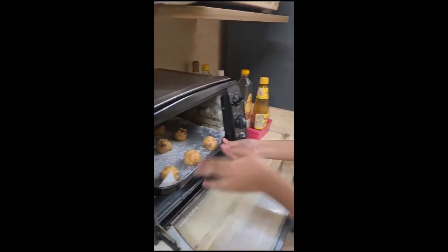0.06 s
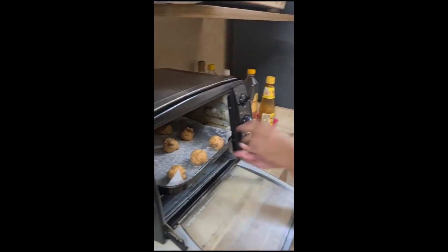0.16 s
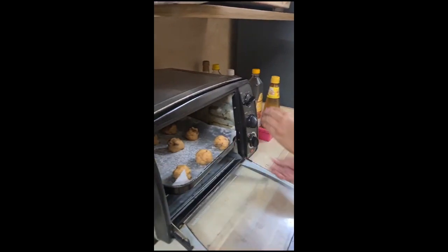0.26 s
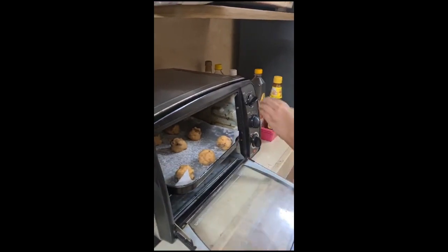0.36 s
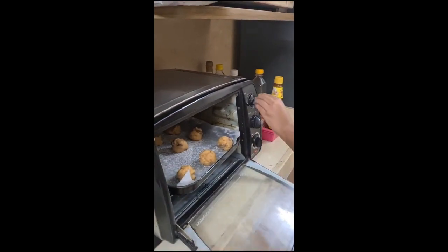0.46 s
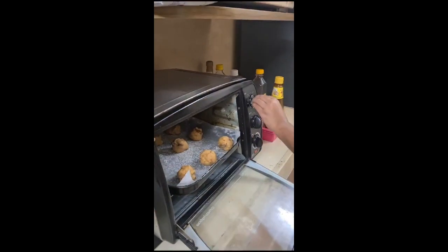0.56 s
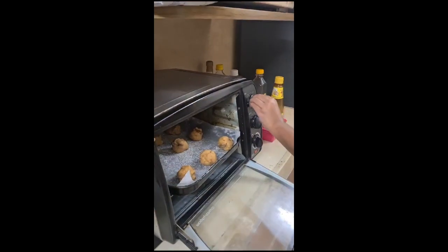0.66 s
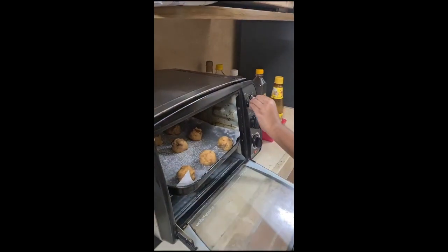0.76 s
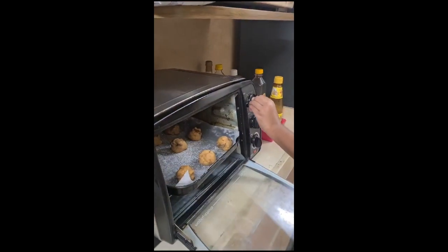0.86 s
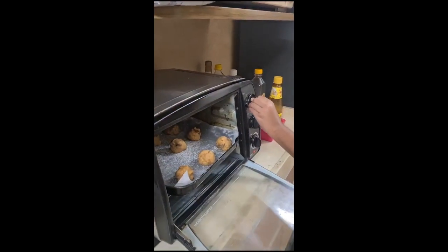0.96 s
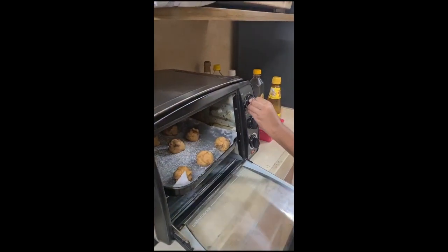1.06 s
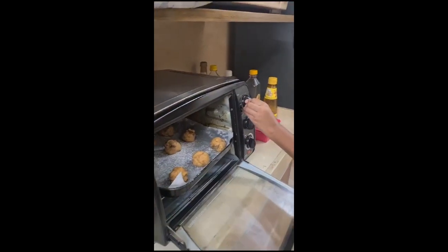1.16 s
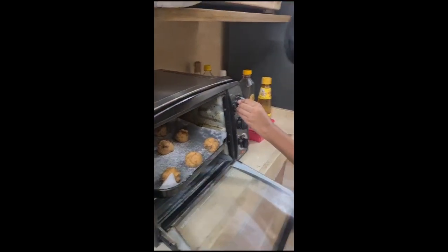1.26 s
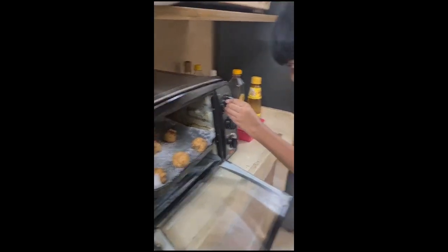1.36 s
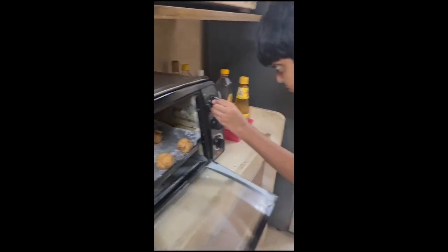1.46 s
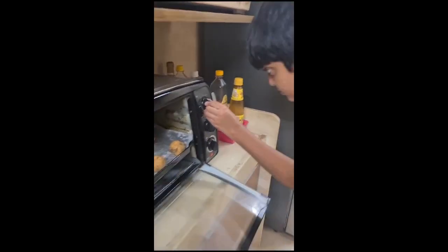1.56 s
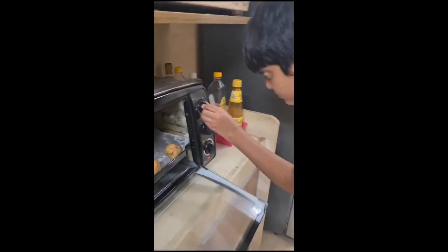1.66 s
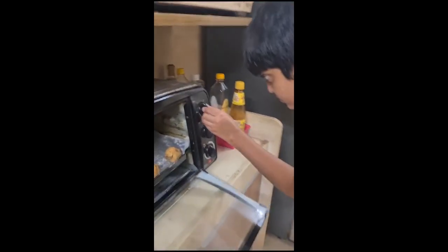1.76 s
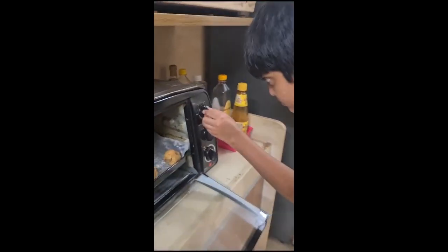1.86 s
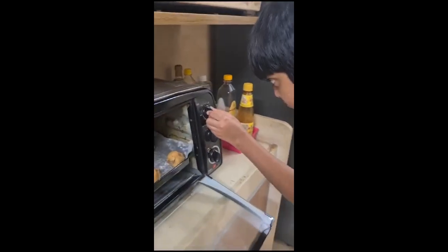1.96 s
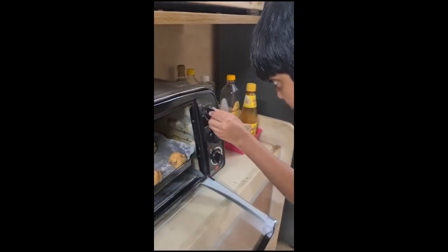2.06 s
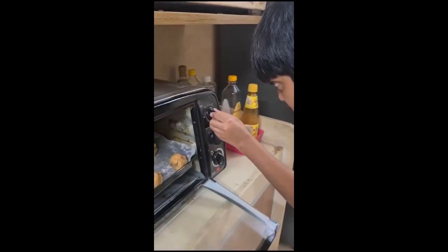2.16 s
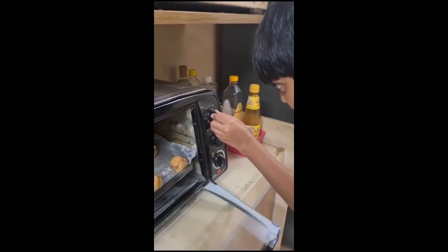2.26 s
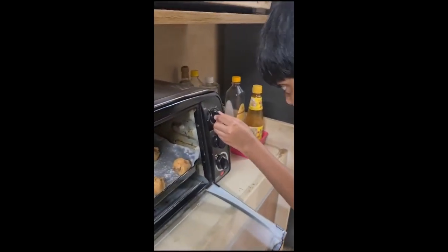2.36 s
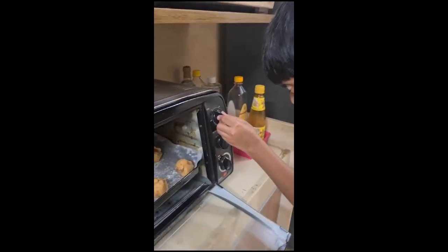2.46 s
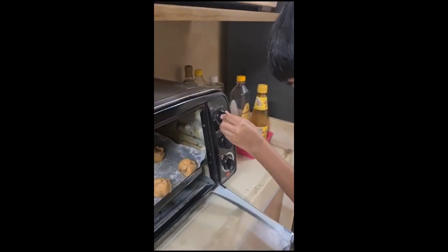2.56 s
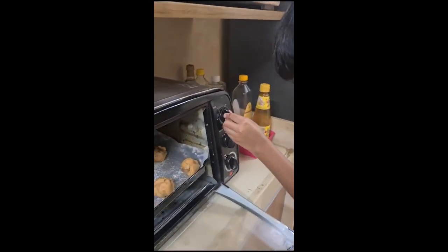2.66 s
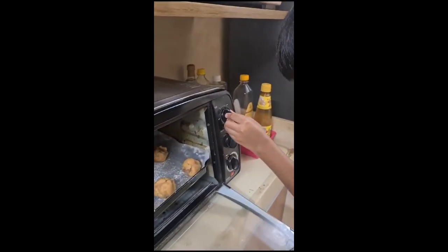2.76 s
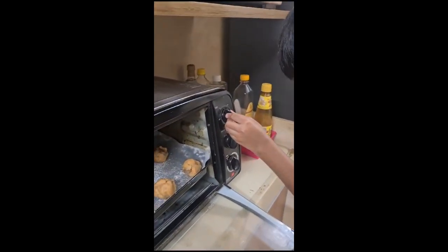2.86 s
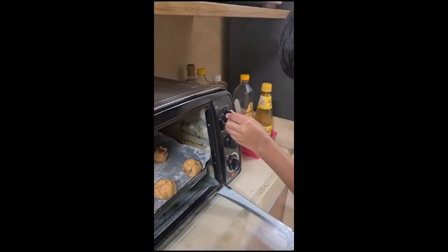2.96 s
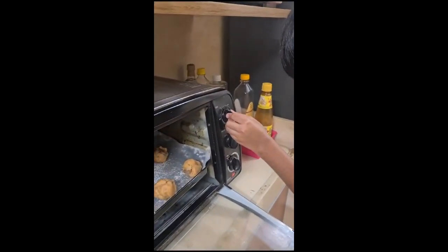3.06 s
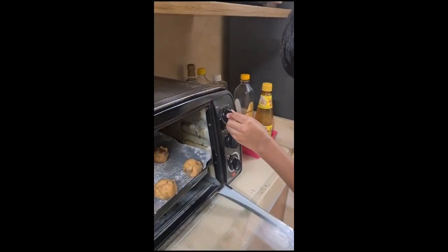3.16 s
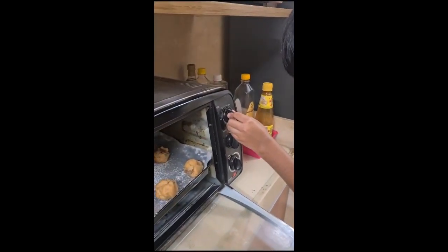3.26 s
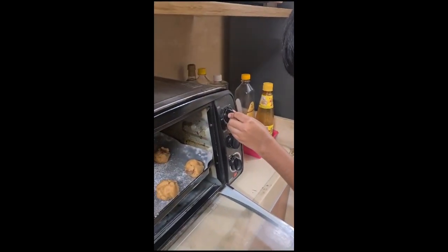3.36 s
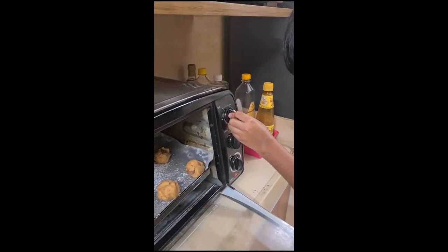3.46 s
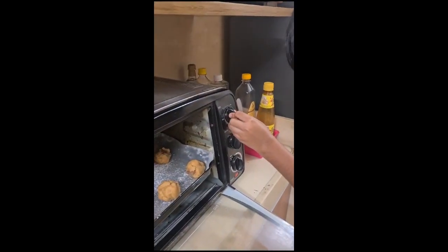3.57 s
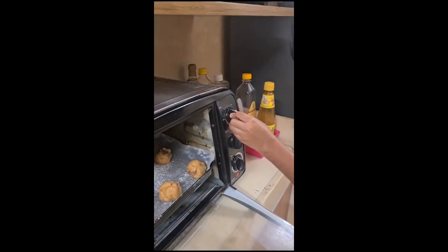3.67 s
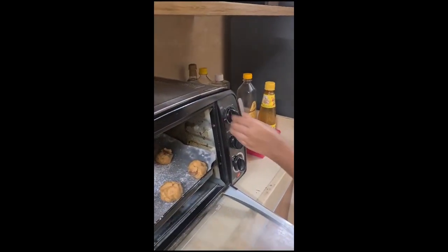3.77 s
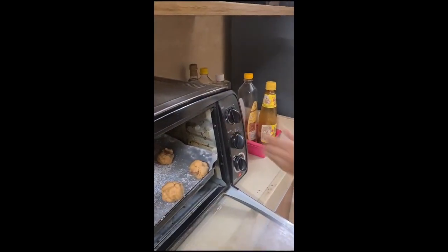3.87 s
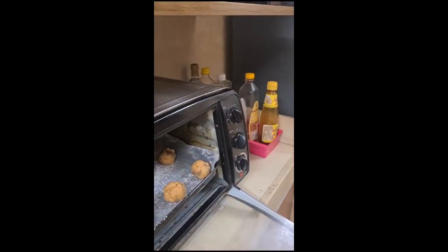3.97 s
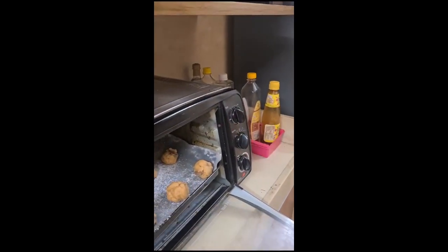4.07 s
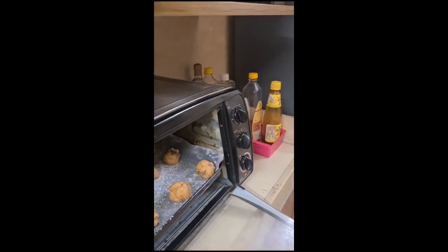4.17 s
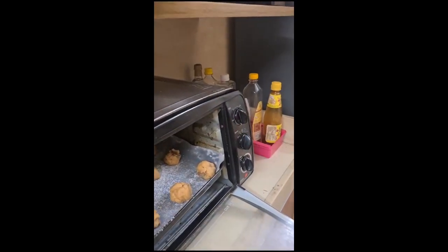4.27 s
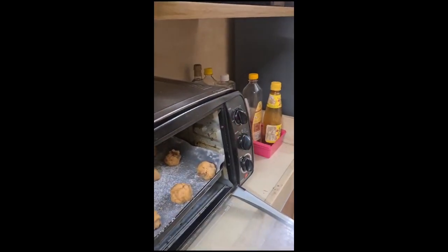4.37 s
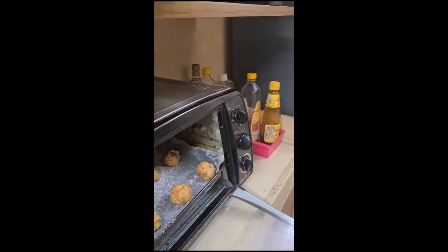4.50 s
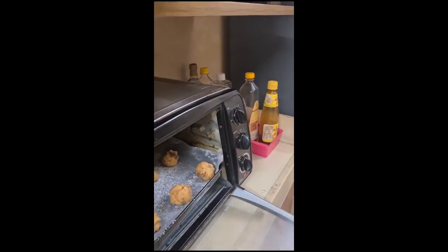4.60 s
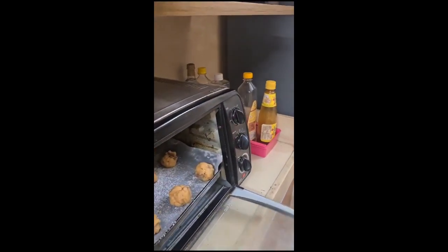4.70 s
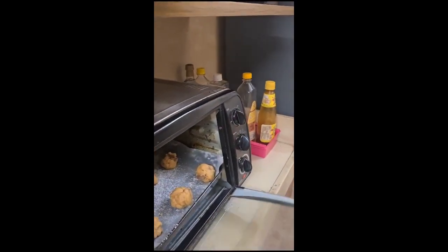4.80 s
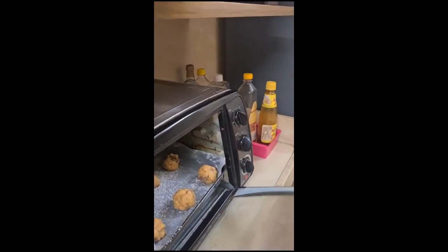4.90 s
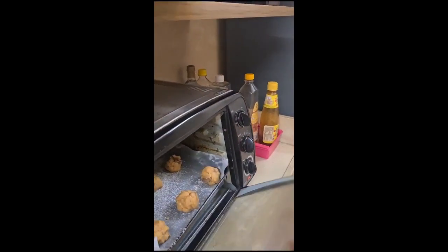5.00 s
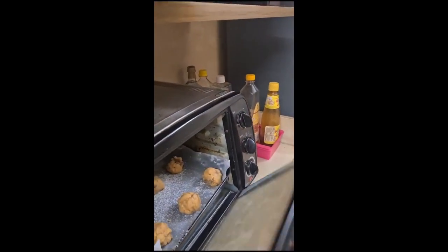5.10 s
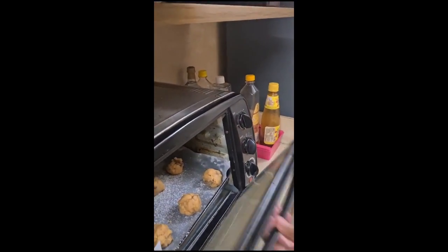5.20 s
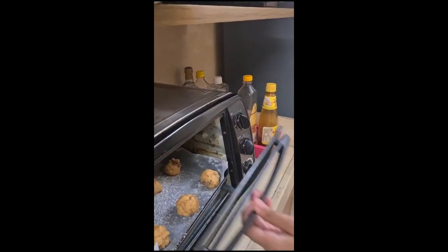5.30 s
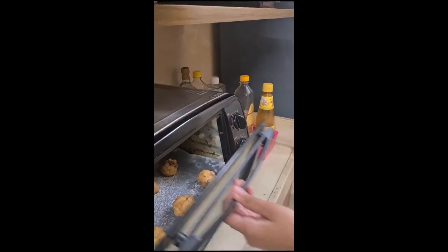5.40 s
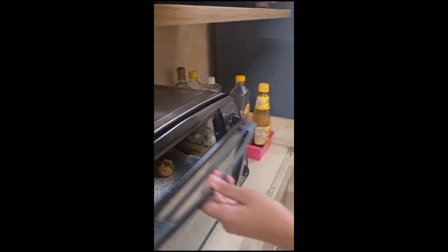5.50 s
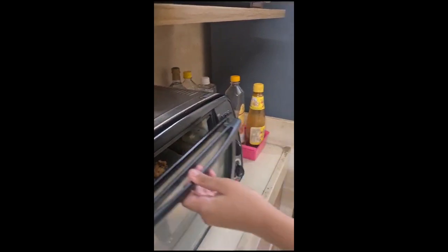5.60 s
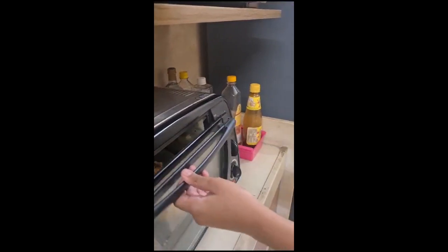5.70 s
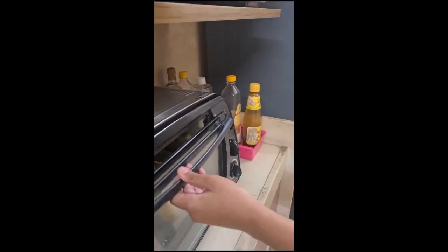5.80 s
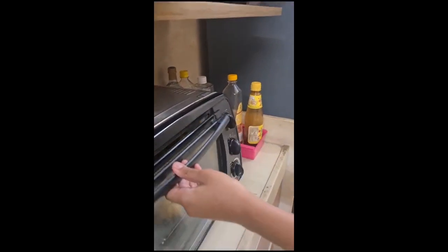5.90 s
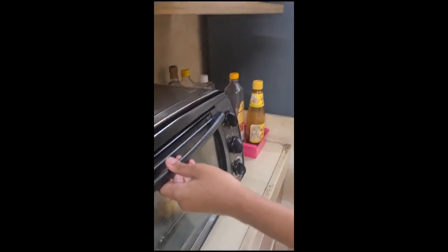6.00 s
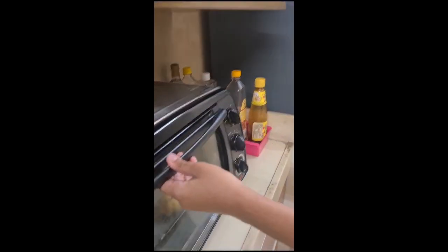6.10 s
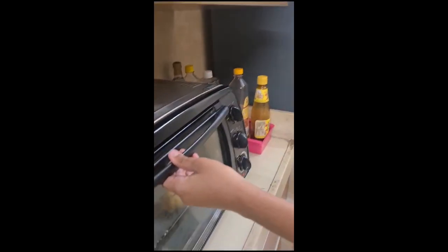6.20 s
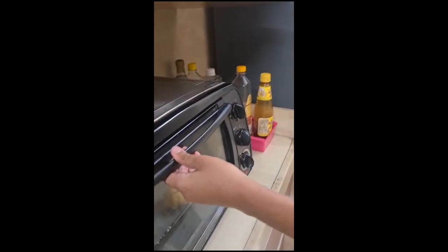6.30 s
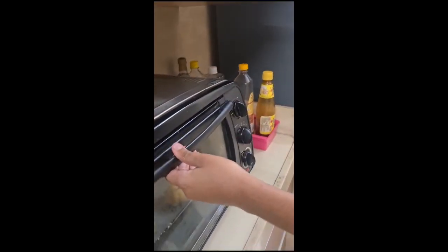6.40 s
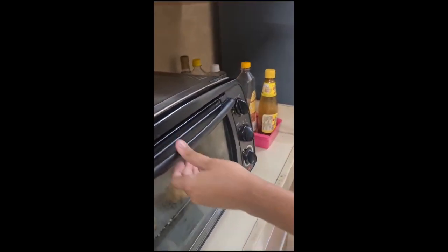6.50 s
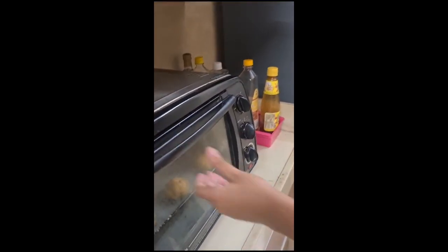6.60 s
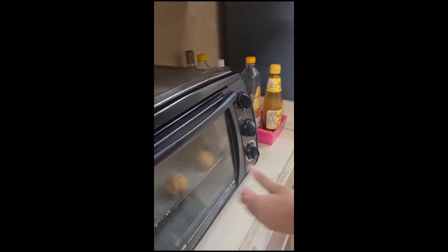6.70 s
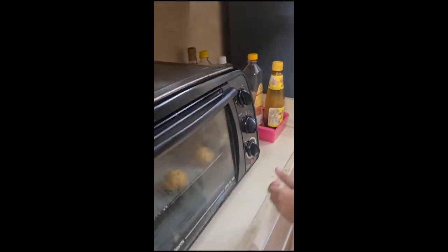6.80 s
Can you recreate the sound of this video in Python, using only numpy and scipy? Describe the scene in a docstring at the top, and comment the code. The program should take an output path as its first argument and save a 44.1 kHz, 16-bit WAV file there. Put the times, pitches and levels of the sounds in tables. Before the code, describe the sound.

A metal tray scrapes into a small oven, a knob is turned, and the glass door shuts with a loud, ringing clack.

```python
"""The glass door of a small countertop oven swings up with a loud clack and shuts against its frame.
Before that, a metal tray is nudged along its rails, a knob is turned and the tray is pushed home.
Each knock or scrape makes the metal case, door or tray ring, and the kitchen adds a short echo.
Dry metal squeals briefly, and shocks thud through the cabinet. The hand-held stereo microphone
picks up bumps and rumble from the grip, a faint rustle, steady air noise and a low appliance hum."""
import sys
import numpy as np
from scipy import signal
from scipy.fft import rfft, irfft
from scipy.io import wavfile

SR = 44100
rng = np.random.default_rng(int(sys.argv[2]) if len(sys.argv) > 2 else 0)


def generate_wav(sig):
    """Save sig (samples, or channels by samples) to the path in sys.argv[1] as 16-bit PCM at SR."""
    pcm = np.round(np.clip(np.atleast_2d(sig).T, -1, 1) * 32767).astype(np.int16)
    wavfile.write(sys.argv[1], SR, pcm)


N = 302085
TIME = np.arange(N) / SR
SPAN = 32768  # samples set aside for one short sound
SPAN_HZ = np.maximum(np.arange(SPAN // 2 + 1) * SR / SPAN, 1)

# the microphone's right side faces away from the oven: pitch_hz, gain_db (against the left)
RIGHT_SIDE_SHADE = [(60, 8.5), (130, 0), (500, -3), (900, -7), (1600, -16.5), (3200, -18), (5000, -17.5),
                    (7500, -31), (9300, 0), (11000, -6), (14000, -19)]
# tone of the rubbing at the knob and the door handle: pitch_hz, gain_db
RUB_TONE = [(115, 4), (400, -13.5), (1340, 1), (3900, -4.5), (6000, -9), (9500, -6), (14000, -19.5)]


def from_db(db):
    """Turn decibels into a gain."""
    return 10 ** (np.asarray(db) / 20)


def unit(x):
    """Scale a sound to an energy of one."""
    return x / np.sqrt(np.sum(x ** 2, axis=-1, keepdims=True) + 1e-20)


def at_hz(points, hz, column=1):
    """Read between the rows of a table, with pitch counted in octaves."""
    points = np.array(points)
    return np.interp(np.log(hz), np.log(points[:, 0]), points[:, column])


def colour(x, points, column=1):
    """Filter a sound to follow a tone curve in dB."""
    cepstrum = irfft(np.log(from_db(at_hz(points, SPAN_HZ, column))))
    # folding onto the first half keeps the filter from ringing before a hit
    cepstrum[1:SPAN // 2] *= 2
    cepstrum[SPAN // 2 + 1:] = 0
    kernel = irfft(np.exp(rfft(cepstrum)))[:SPAN // 8]
    kernel = kernel.reshape((1,) * (x.ndim - 1) + (-1,))
    return signal.oaconvolve(x, kernel, axes=-1)[..., :x.shape[-1]]


def add(out, start_s, sound):
    """Mix a stereo sound in at a given time."""
    start = max(round(start_s * SR), 0)
    out[:, start:start + sound.shape[1]] += sound[:, :N - start]


def drift(per_s):
    """A slow random wobble, about one in size."""
    return np.interp(TIME * per_s, np.arange(1000), rng.standard_normal(1000))


def noise_pair(size, alike):
    """Left and right white noise; alike is the share they have in common."""
    common = np.sqrt(alike) * rng.standard_normal(size)
    return common + np.sqrt(1 - alike) * rng.standard_normal((2, size))


def room_air():
    """Steady, mostly deep noise fills the kitchen."""
    # the air noise on each side: pitch_hz, level_db (per Hz)
    left_tone = [(20, -80), (40, -71.5), (70, -76.5), (115, -73), (200, -82), (400, -91), (700, -93),
                 (1200, -95), (1700, -105), (2600, -112), (5000, -118), (6000, -118), (10000, -126),
                 (14000, -128)]
    right_tone = [(20, -66), (40, -56.5), (70, -62.5), (115, -65.5), (200, -77.5), (400, -84.5), (700, -95),
                  (1200, -101), (1700, -110), (2600, -120), (5000, -121), (6000, -120), (10000, -125),
                  (14000, -128)]
    left, right = noise_pair(N, alike=0.22) * np.sqrt(SR / 2)
    return np.array([colour(left, left_tone), colour(right, right_tone)])


def appliance_hum(waver_db=4.0):
    """An appliance hums in a few low, wavering tones."""
    # the tones of the hum: pitch_hz, level_db (before wavering)
    tones = [(100, -52), (147, -58.5), (250, -66), (347, -65.5)]
    hum = 0
    for hz, db in tones:
        peak = np.sqrt(2) * from_db(db + waver_db * drift(7))
        hum = hum + peak * np.sin(2 * np.pi * hz * TIME + drift(6))
    return hum


def hand_movement(resting_rustle_db=-60.5, rumble_left_db=-11.0, flutter_db=3.5):
    """With each move the grip rumbles, mostly on the right; arm and door rustle faintly."""
    # the arm reaches for the knob, takes the door, shuts it and pulls back:
    # middle_s, half_length_s, rumble_db, rustle_db
    gestures = [(.8, 1.0, -50.5, -64), (4.8, 0.44, -49, -55), (6.03, 0.36, -34, -56.5),
                (6.7, 0.21, -41, -68.5)]
    # tone of the rumble and of the rustle: pitch_hz, gain_db
    rumble_tone = [(20, -28.5), (50, 7), (75, 7), (130, -0.5), (220, -11), (500, -34), (1500, -82)]
    rustle_tone = [(100, -0.5), (300, 4), (600, -6), (1300, -14.5), (3000, -26), (6000, -35), (8000, -33),
                   (10000, -44.5)]
    rumble_power, rustle_power = 0, from_db(resting_rustle_db) ** 2
    for middle_s, half_length_s, rumble_db, rustle_db in gestures:
        swell = np.exp(-((TIME - middle_s) / half_length_s) ** 2)
        rumble_power = rumble_power + swell * from_db(rumble_db) ** 2
        rustle_power = rustle_power + swell * from_db(rustle_db) ** 2
    rumble = np.sqrt(N) * unit(colour(noise_pair(N, alike=0.91), rumble_tone))
    rumble *= from_db([[rumble_left_db], [0]])
    left, right = np.sqrt(N) * unit(colour(noise_pair(N, alike=0.38), rustle_tone))
    rustle = np.array([left, colour(right, RIGHT_SIDE_SHADE)]) * from_db(flutter_db * drift(7.7))
    return rumble * np.sqrt(rumble_power) + rustle * np.sqrt(rustle_power)


def low_ring(hz, fade_s, db, pan_db):
    """One tone that falls by 60 dB in fade_s; a negative pan_db moves it right."""
    t = TIME[:SPAN]
    sides = from_db([[db + pan_db / 2], [db - pan_db / 2]])
    return sides * np.sin(2 * np.pi * hz * t) * from_db(-60 * t / fade_s)


def grip_bumps(cycles=2.17):
    """The hand bumps the microphone's right side; each bump dies within a few cycles."""
    # bumps of the hand: start_s, pitch_hz, level_db
    bumps = [(0.918, 200, -38), (1.46, 280, -31), (2.941, 262, -39), (6.038, 107, -11.5), (6.055, 149, -16),
             (6.212, 141, -28), (6.444, 325, -41)]
    out = np.zeros((2, N))
    for start_s, hz, db in bumps:
        add(out, start_s, low_ring(hz, cycles / hz, db, pan_db=-18))
    return out


def cabinet_thuds(fall_db_per_octave=25):
    """A shock wakes the cabinet's low tones, most of all those near its own pitch."""
    # low tones of the cabinet on the counter: pitch_hz, gain_db, fade_s
    tones = [(106, 0, 0.2), (180, -1, 0.96), (281, 1, 0.64), (503, -4.5, 0.26)]
    # shocks that shake it: start_s, pitch_hz, level_db
    shocks = [(.321, 177, -37), (3.715, 288, -43.5), (4.51, 281, -44), (5.512, 112, -21),
              (5.513, 455, -23.5), (5.966, 106, -18.5), (5.996, 111, -16)]
    out = np.zeros((2, N))
    for start_s, shock_hz, shock_db in shocks:
        for hz, gain_db, fade_s in tones:
            db = shock_db + gain_db - fall_db_per_octave * abs(np.log2(hz / shock_hz))
            add(out, start_s, low_ring(hz, fade_s, db, pan_db=-0.5))
    return out


def kitchen_echo(build_s=0.0015):
    """Reflections build up quickly and die sooner in the treble."""
    # time the echo takes to fall by 60 dB: pitch_hz, fade_s
    fades = [(100, 1), (260, 0.62), (700, 0.56), (1840, 0.43), (4850, 0.37), (12800, 0.3)]
    t, echo = TIME[:SPAN], 0
    spectrum = rfft(noise_pair(SPAN, alike=0.45))
    edges_hz = np.geomspace(20, SR / 2, 13)
    for low, high in zip(edges_hz, edges_hz[1:]):
        band = irfft(spectrum * ((SPAN_HZ >= low) & (SPAN_HZ < high)))
        echo = echo + band * from_db(-60 * t / at_hz(fades, np.sqrt(low * high)))
    return unit(echo * (1 - np.exp(-t / build_s)))


def tap_sound(tones, bands, click_db, panel_fade_s, ring_db, echo_db, longest_fade_s=0.49):
    """How a part answers one tap: a click, a noisy burst from its panels, ringing tones and the echo."""
    t, ring = TIME[:SPAN], 0
    click = from_db(click_db) * (t == 0)
    panels = unit(noise_pair(SPAN, alike=0.25) * from_db(-60 * t / panel_fade_s))
    for hz, db, fade_s in tones:
        start_db = db + 7.0 * np.log2(hz / 1000)  # higher tones gain 7 dB per octave
        fade = from_db(start_db - 60 * t / min(fade_s, longest_fade_s))
        ring = ring + fade * np.sin(2 * np.pi * hz * t) * rng.choice([-1, 1])
    tap = unit(click + panels + from_db(ring_db) * ring + from_db(echo_db) * kitchen_echo())
    # clusters of close tones lift a few broad bands
    lift = sum(from_db(db) * signal.lfilter(*signal.iirpeak(hz, hz / width_hz, fs=SR), tap)
               for hz, width_hz, db in bands)
    return unit(tap + lift)


def knock(length_s, bounce=0.75, count=4):
    """A hit breaks up into quick rebounds, which spread it in time but keep its tone."""
    spectrum = 1
    for gap_s in length_s * np.geomspace(.06, .4, count) * rng.uniform(.8, 1.2, count):
        delay = np.exp(-2j * np.pi * SPAN_HZ * round(gap_s * SR) / SR)
        spectrum = spectrum * (delay - bounce) / (1 - bounce * delay)  # all-pass filter
    return unit(irfft(spectrum))


def scrape(length_s, hits_per_s=2500, spread_db=1.5, rise_share=0.18):
    """Tiny, uneven hits swell and then stop, heard as a scrape or a hiss."""
    progress = TIME[:SPAN] / length_s
    swell = np.minimum(progress / rise_share, 1) / (1 + progress ** 8)
    sizes = from_db(spread_db * np.minimum(rng.exponential(1, SPAN), 4))
    signs = rng.choice([-1, 1], SPAN)
    hits = rng.random(SPAN) < hits_per_s / SR
    return unit(sizes * signs * hits * swell)


def twist(length_s):
    """A turn of the knob is a finer scrape that swells more slowly."""
    return scrape(length_s, hits_per_s=4000, spread_db=-0.2, rise_share=0.35)


def contacts(events, motion, tone, tap):
    """Each event sets a part ringing; a harder one is brighter."""
    out = np.zeros((2, N))
    hz, tone_db = np.transpose(tone)
    for start_s, length_s, level_db, hardness in events:
        curve_db = level_db + tone_db + hardness * np.log2(hz / 1000)
        force = colour(motion(length_s), np.column_stack([hz, curve_db]))
        add(out, start_s, signal.fftconvolve(tap, force[None], axes=1)[:, :SPAN])
    return out


def metal_squeals():
    """Dry metal slips and sings around one pitch, and the kitchen carries it on."""
    # first the tray's rim, then the hinge: start_s, length_s, pitch_hz, width_hz, level_db
    slips = [(0.295, 0.019, 2900, 2400, -47), (4.499, 0.021, 7230, 1880, -41),
             (4.935, 0.054, 2990, 200, -64), (5.088, 0.025, 4300, 1400, -68),
             (5.888, 0.045, 2600, 2000, -51.5)]
    out = np.zeros((2, N))
    for start_s, length_s, hz, width_hz, db in slips:
        peak = signal.iirpeak(hz, hz / width_hz, fs=SR)
        squeal = signal.lfilter(*peak, signal.lfilter(*peak, scrape(length_s)))
        echoed = unit(signal.fftconvolve(kitchen_echo(), squeal[None], axes=1))
        add(out, start_s, from_db(db) * np.sqrt(length_s * SR) * echoed)
    return out


def knob(case_tap, front_tap):
    """The knob knocks against the case and rubs on its shaft, which sounds through the front panel; two sharp
    clicks among the knocks come from the hand bumping the microphone."""
    # its knocks and turns, where the knocks at 0.917 s and 2.941 s are the sharp clicks of the hand bumping the
    # microphone: start_s, length_s, level_db, hardness_db_per_octave
    knocks = [(.917, 0.0024, -19.5, -5), (1.458, 0.0031, -13, 2), (1.473, 0.0062, -6.5, 4),
              (2.941, 0.0018, -19.5, -2.5), (3.697, .006, -8.5, -1), (3.864, 0.0021, -19.5, 3)]
    turns = [(1.225, 0.062, -17.5, -2.5), (1.455, 0.086, -15.5, 1), (1.69, 0.041, -16.5, -2.5),
             (1.775, 0.069, -13, -2), (1.99, 0.073, -17.5, 3)]
    # tone of a knock: pitch_hz, gain_db
    knock_tone = [(115, 16.5), (400, 8), (1340, -3.5), (3900, -28.5), (11300, -36)]
    return contacts(knocks, knock, knock_tone, case_tap) + contacts(turns, twist, RUB_TONE, front_tap)


def tray():
    """The metal tray rings as it catches and scrapes on its rails; a faint hiss leads into one catch."""
    # its ringing tones, before tap_sound tilts and shortens them: pitch_hz, level_db, fade_s
    tones = [(178.2, 7.5, 1.9), (380, -6, 0.68), (756, -9.5, 0.57), (910, -2, 1.0), (1202, -15, 0.72),
             (1430, -0.5, 0.22), (1715, -8, 0.22), (2840, -3.5, 0.052), (3120, -50, 0.23), (3220, -28, 0.6),
             (3640, -59, 0.18), (4200, -11, 0.083)]
    # its broad resonances: pitch_hz, width_hz, level_db
    bands = [(280, 5.7, 10), (795, 160, -2.5), (2970, 1100, -40), (7540, 1500, 4.5)]
    # it catches on the rails: start_s, length_s, level_db, hardness_db_per_octave
    catches = [(.304, 0.013, -5, -1.5), (.48, .006, -15, -4), (4.407, 0.01, 0.5, 0.5),
               (4.418, 0.0089, 1, -.5), (4.502, .0042, -4.5, 1.5)]
    # scrapes, and in the second row a faint hiss swelling just before the tray catches: same columns
    noises = [(.308, 0.031, -5, -3), (4.398, .02, -7, 3), (4.415, 0.095, 7, 0), (4.505, 0.051, -15, 1.5)]
    # tone of a catch and of those noises: pitch_hz, gain_db
    catch_tone = [(115, 0.5), (400, 8.5), (750, 6.5), (1500, -2.5), (3900, -1), (11300, -15)]
    noise_tone = [(115, 9.5), (400, 7), (900, 2.5), (1700, -5), (3900, -6.5), (11300, -22.5)]
    tap = tap_sound(tones, bands, click_db=0.0, panel_fade_s=0.044, ring_db=-42.5, echo_db=-0.5)
    return contacts(catches, knock, catch_tone, tap) + contacts(noises, scrape, noise_tone, tap)


def door_handle(front_tap):
    """Fingers rub on the handle as they shift and let go."""
    # brushes of the fingers: start_s, length_s, level_db, hardness_db_per_octave
    brushes = [(6.42, 0.055, -15, -7.5), (6.741, 0.014, -13, 0)]
    return contacts(brushes, scrape, RUB_TONE, front_tap)


def door_hinge(case_tap, front_tap):
    """As the door swings up, the hinge drags, ticks, snaps over with a clack and rebounds."""
    # its drags and snaps: start_s, length_s, level_db, hardness_db_per_octave
    drags = [(4.93, 0.073, -17.5, -4.5), (5.09, 0.031, -17, 2), (5.78, .12, -8, 3.5), (5.885, 0.03, 2, 0.5),
             (5.93, 0.11, 0.5, -0.5)]
    snaps = [(5.355, .009, -15.5, -2.5), (5.511, 0.011, 17.5, -0.5), (5.637, .004, -9.5, 2)]
    # tone of a drag and of a snap: pitch_hz, gain_db
    drag_tone = [(115, 11), (380, 2), (650, -2), (1340, 3), (3900, -12.5), (11300, -36.5)]
    snap_tone = [(115, 1), (400, 0.5), (1340, -0.5), (3900, -1.5), (11300, -19.5)]
    return contacts(drags, scrape, drag_tone, front_tap) + contacts(snaps, knock, snap_tone, case_tap)


def door_slam():
    """The glass door touches its frame, then slams home and rings."""
    # its ringing tones, before tap_sound tilts and shortens them: pitch_hz, level_db, fade_s
    tones = [(400, -2.5, 0.39), (455, -6.5, 0.9), (644, -16, 0.63), (709, -1.5, 0.39), (808, -4, 0.53),
             (940, -5, 0.58), (1015, 1, 0.16), (1194, -7.5, 0.25), (1427, -9, 0.26), (1880, -15, 0.39),
             (2110, 0, 0.081), (2500, -8, 0.08), (2520, -20, 0.47), (2460, -16, 0.33), (2810, -17.5, 0.34),
             (3160, -16, 0.22), (3467, -25, 0.28), (3628, -14, 0.27), (3620, -14, 0.32), (4200, -14, 0.29)]
    # its broad resonances: pitch_hz, width_hz, level_db
    bands = [(180, 41, -1.5), (1210, 51, -6), (1345, 103, 5.5), (2680, 390, 1), (8500, 420, -4)]
    # the touch and the slam: start_s, length_s, level_db, hardness_db_per_octave
    hits = [(5.982, .0026, 4, -0.5), (5.986, .008, 16.5, 0)]
    # tone of a hit: pitch_hz, gain_db
    hit_tone = [(115, 14), (400, -3), (1340, 2.5), (3900, -14.5), (11300, -16)]
    tap = tap_sound(tones, bands, click_db=0.5, panel_fade_s=0.033, ring_db=-41.5, echo_db=-1.0,
                    longest_fade_s=0.45)
    return contacts(hits, knock, hit_tone, tap)


def oven(lowest_hz=75):
    """Tray, knob and door together; so small a case gives off little deep bass."""
    # the sheet-metal case's tones, before tap_sound tilts and shortens them: pitch_hz, level_db, fade_s
    tones = [(280, -11, 0.37), (502, -6, 0.68), (680, -5, 0.88), (818, -11, 0.93), (1048, 2.5, 0.058),
             (1256, -6, 0.14), (1560, -50, 2.4), (1770, -10, 0.19), (2110, -54.5, 1.3), (2370, -17, 0.31),
             (2970, -16.5, 0.24), (3290, -27, 0.14), (4030, -31.5, 0.45), (5500, -31, 0.77),
             (6720, -40, 0.68), (7208, -32, 1.1)]
    # broad resonances of the case and of its front panel: pitch_hz, width_hz, level_db
    case_bands = [(287, 29, -1), (501, 32, 1.5), (1080, 99, -6.5), (1330, 110, 3), (1517, 62, -6),
                  (2480, 77, -3), (3150, 150, -5.5), (7150, 790, -4.5)]
    front_bands = [(423, 58, 8.5), (2820, 300, -4.5), (3900, 240, -14.5)]
    case = tap_sound(tones, case_bands, click_db=2.0, panel_fade_s=0.076, ring_db=-40.0, echo_db=-0.5)
    front = tap_sound(tones, front_bands, click_db=-5.0, panel_fade_s=0.032, ring_db=-41.5, echo_db=4.5)
    door = door_slam() + door_hinge(case, front) + door_handle(front)
    parts = door + tray() + knob(case, front) + metal_squeals()
    bass_cut = signal.butter(2, lowest_hz, "high", fs=SR, output="sos")
    left, right = signal.sosfilt(bass_cut, parts)
    return np.array([left, colour(right, RIGHT_SIDE_SHADE)])


def scene(soften_hz=1100):
    """Everything that reaches the microphone, with the thuds and bumps softened."""
    soften = signal.butter(2, soften_hz, "low", fs=SR, output="sos")
    shocks = signal.sosfilt(soften, cabinet_thuds() + grip_bumps())
    return oven() + shocks + hand_movement() + room_air() + appliance_hum()


def record(dry, change_s=4.427, blend_s=0.079, cutoff_hz=15800):
    """A dip in the treble fills in partway through; the very top is cut off."""
    # tone of the treble: pitch_hz, before_db, after_db
    treble = [(5470, -1, -0.5), (6000, 4, 2), (7040, -10, 1), (8280, -11.5, 4), (7940, -0.5, 5.5),
              (9270, 0, -7), (11600, -0.5, -1), (13700, 4, -1.5), (15600, -17, -9.5)]
    filled = np.clip((TIME - change_s) / blend_s + .5, 0, 1)
    sound = (1 - filled) * colour(dry, treble, column=1) + filled * colour(dry, treble, column=2)
    top_cut = signal.ellip(10, .2, 80, cutoff_hz, fs=SR, output="sos")
    return signal.sosfilt(top_cut, sound)


dry = scene()
out = record(dry)
generate_wav(out)
```